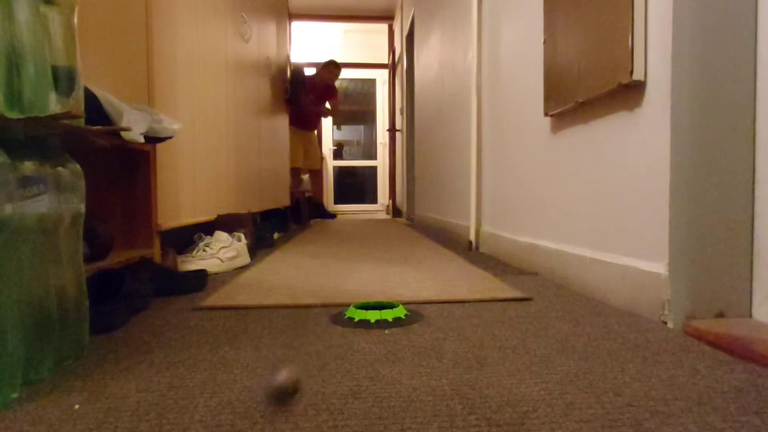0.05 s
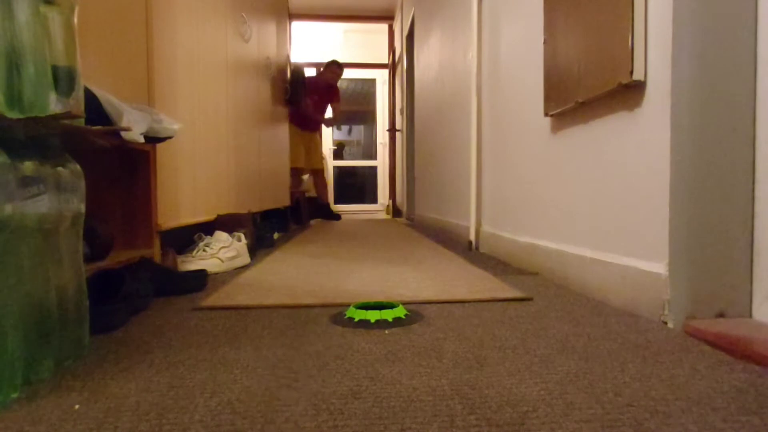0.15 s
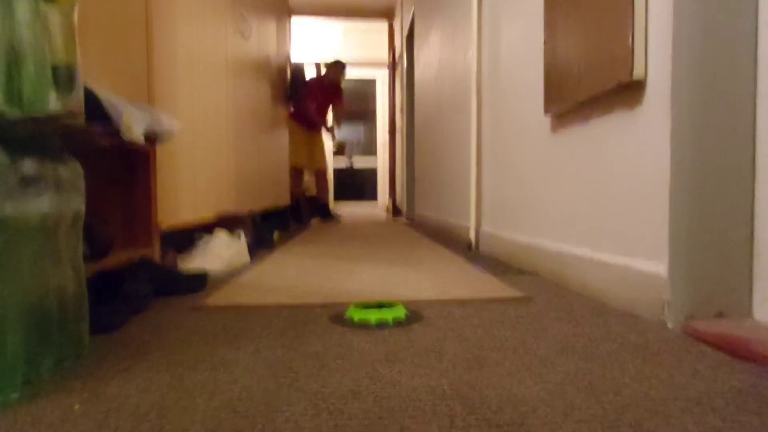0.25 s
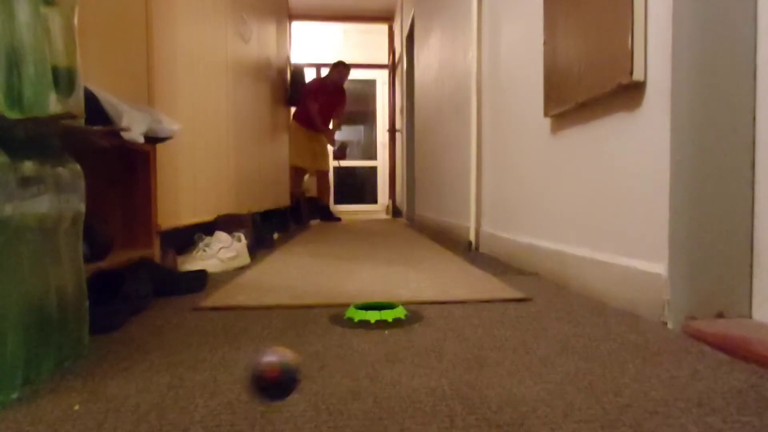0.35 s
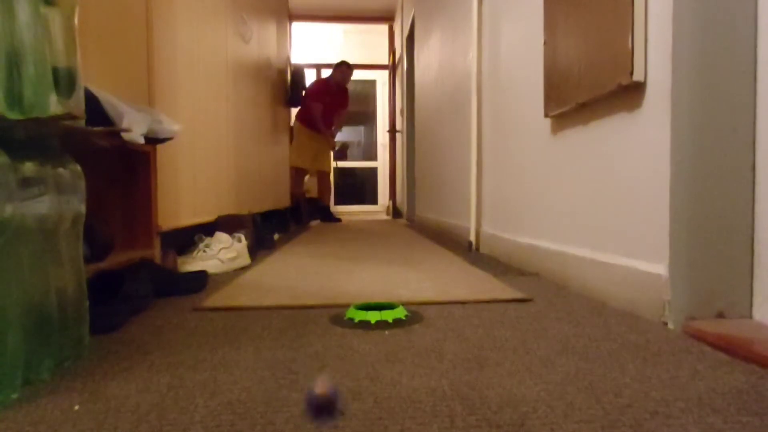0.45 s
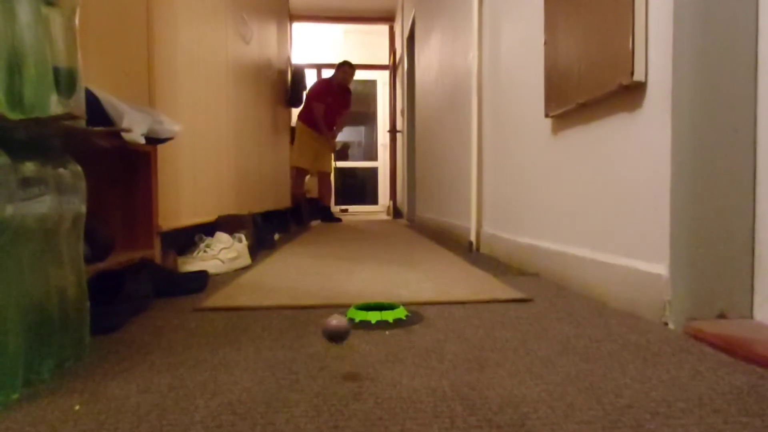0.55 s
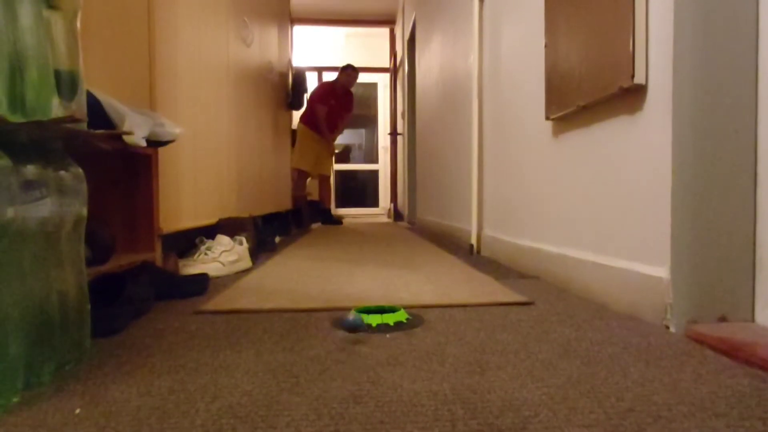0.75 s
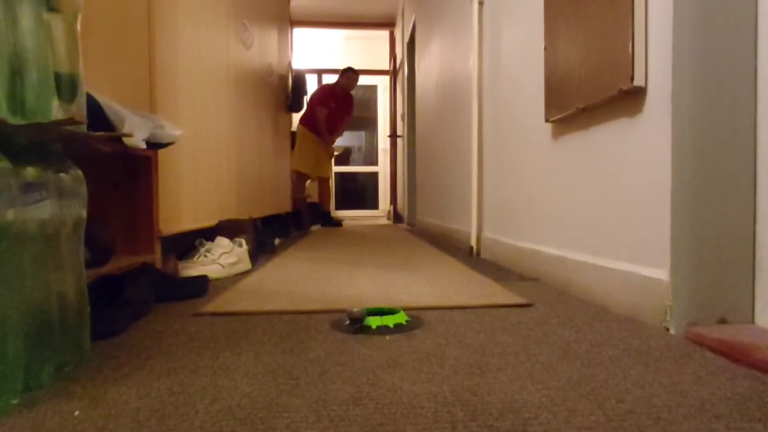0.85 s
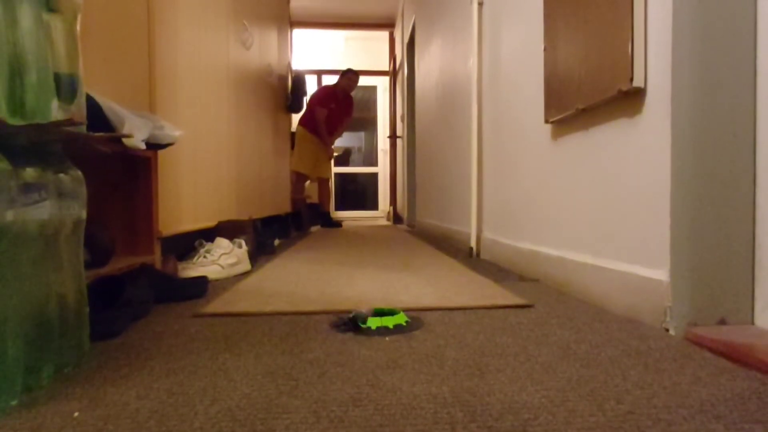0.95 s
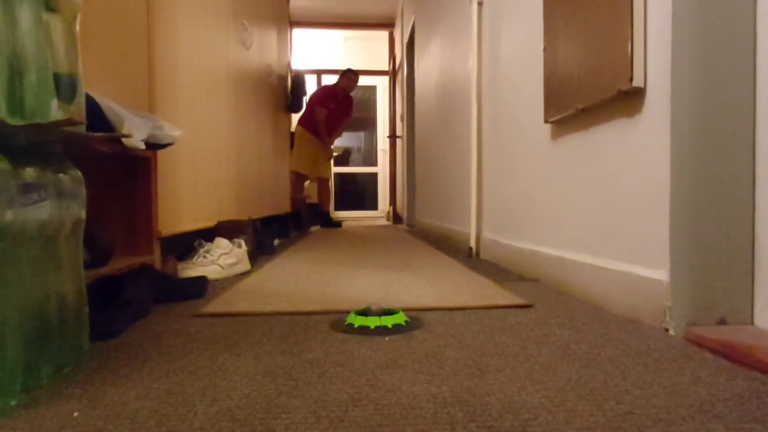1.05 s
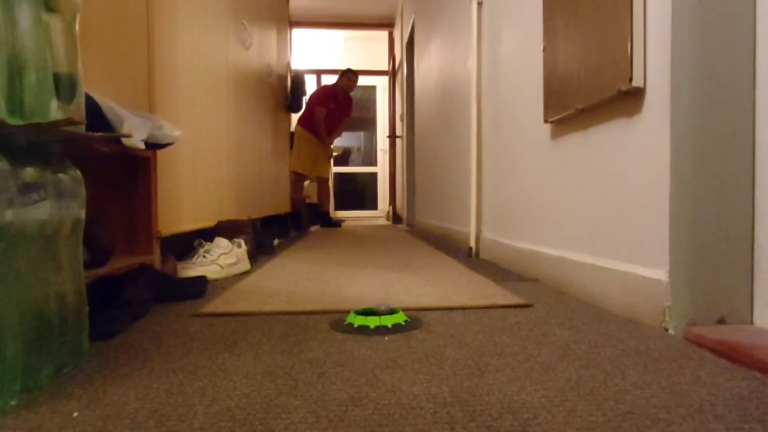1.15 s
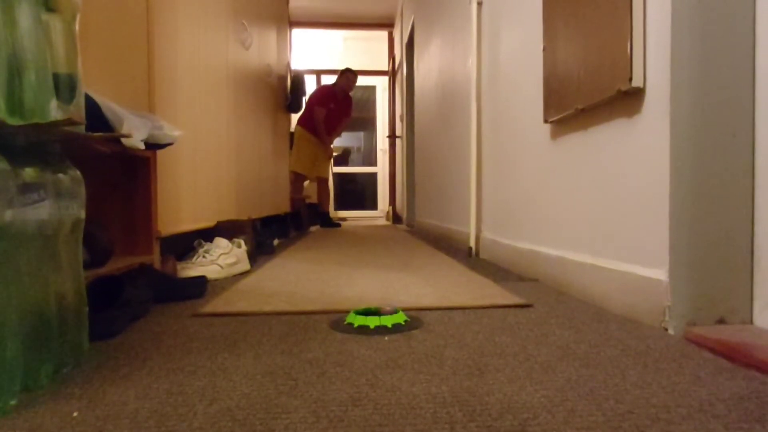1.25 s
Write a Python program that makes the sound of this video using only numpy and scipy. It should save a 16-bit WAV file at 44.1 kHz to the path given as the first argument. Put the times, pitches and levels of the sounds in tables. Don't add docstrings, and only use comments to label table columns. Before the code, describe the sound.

One sharp, loud knock as a small hard ball hits a box right beside the microphones, after faint carpet hops; low floor booms and hallway echo follow, then softer bounces and a faint plastic cup rattle.

```python
import sys
import numpy as np
from scipy import signal
from scipy.io import wavfile
from scipy.ndimage import uniform_filter1d

SR = 44100
rng = np.random.default_rng(int(sys.argv[2]) if len(sys.argv) > 2 else 0)


def generate_wav(signal):
    frames = np.transpose(np.atleast_2d(signal))
    scaled = np.clip(frames, -1, 1) * 32767
    pcm = np.round(scaled).astype(np.int16)
    wavfile.write(sys.argv[1], SR, pcm)


def volts_from_decibels(level):
    exponent = np.asarray(level, float) / 20
    return 10 ** exponent


N = 57330

# frequency in Hz, level in dB.
ROOM_TONE = [(15, -33), (25, -0.5), (156, -1.5), (421, -19), (761, -35), (1950, -46.5), (3000, -59.5),
             (3930, -49), (15500, -63.5)]
# time in seconds, level in dB.
RUMBLE_FADE = [(0, 15.5), (.23, 5), (.6, -2.5), (.9, 0.5), (1.05, -6), (1.3, -6.5)]
# time in seconds, level in dB.
HISS_FADE = [(0, 16), (0.229, 14), (0.549, 0), (1.3, -4)]
# start in seconds, level in dB, contact in ms, cup ring in dB, left-right pan in dB.
LANDINGS = [(.0, -50, 0.66, -28, -23.5), (0.015, -37.5, 1.3, -9.5, -9), (0.116, -32.5, 0.52, -9.5, -1),
            (0.374, -34, 0.27, -30, -5), (.417, -43, 0.2, -29, 11), (0.487, -54.5, 0.13, -32, -13),
            (0.5218, -37.5, 0.43, -19, -6), (0.65, -49, 0.66, -3, 13), (0.73, -52, 0.84, -12.5, -9),
            (0.808, -51, 1.2, 0, -11.5), (0.871, -47, 3.6, -6, 16), (0.945, -45.5, 1.3, 4.5, 6),
            (1.081, -53.5, 0.29, 9.5, 3), (1.207, -52, .45, -7, -3)]
# frequency in Hz, level in dB, T60 in seconds.
BOARD_MODES = [(168, -6.5, .06), (260, -3, 0.074), (368, -5.5, 0.11), (476.3, 1.5, 0.037),
               (713, -6.5, 0.068), (926, -12, 0.044), (1157, -12.5, 0.043), (1730, -13, 0.04)]
# frequency in Hz, T60 in seconds, level in dB.
HALL_DECAY = [(59.8, 0.36, -2), (130, 1, 1.5), (300, .55, 5.5), (730, .45, -9), (1508, 0.51, -15),
              (2850, 0.48, -24), (6800, 0.49, -33), (12900, 0.26, -29.5)]
# start in seconds, level in dB, pitch in Hz, left-right pan in dB.
LATE_BOOMS = [(0.034, -54.5, 113.2, 5), (.075, -42.5, 116.6, 26), (0.117, -35, 127.6, 6.5),
              (0.131, -26, 86.4, -6), (0.164, -33.5, 131, 8), (0.277, -24, 74.7, 14.5),
              (0.306, -21, 119.5, -3.5), (.32, -28.5, 68.3, 12), (0.312, -30, 260, -3.5),
              (0.374, -30, 66, -0.5), (0.413, -26.5, 130, 1), (0.486, -35, 93.4, -4),
              (.525, -33, 108.7, 1), (.73, -35, 125, -0.5), (.75, -46.5, 79, -4), (0.872, -43.5, 90, -2),
              (0.894, -47, 114, -16.5), (.94, -42.5, 105, -4.5), (1.109, -60.5, 65.3, 13),
              (1.211, -48, 86, 0)]
SCRAPE_STARTS = [.115, .5205, .655, .805, .946, .963, .978, 1.078, 1.11, 1.126, 1.205]
# decay constant in seconds, level in dB, left-right pan in dB.
SCRAPES = [(.01, -58, -3), (0.0052, -63, 8), (0.0062, -69.5, -8), (0.0071, -68, -10.5),
           (0.029, -61.5, -6.5), (0.018, -59, 8.5), (0.045, -60, 4), (0.018, -60, 0.5),
           (0.0081, -68.5, 11.5), (0.038, -69.5, -3), (0.0059, -65.5, 3.5)]
# frequency in Hz, width in Hz, level in dB.
CUP_WALL_BANDS = [(1590, 660, 7), (2000, 440, 0.5), (3420, 560, -2.5), (5555, 690, -16.5),
                  (6667, 1200, -28.5), (11880, 4000, -23)]
# frequency in Hz, level in dB, T60 in seconds, left-right pan in dB, polarity at the right mic.
BOX_MODES = [(72, -26, 0.28, 5, -1), (128, -11.5, .12, 5, 1), (165.3, -8.5, .08, 1, 1),
             (313.3, -8.5, 0.18, -4, 1), (476.6, -6.5, 0.045, 11.5, -1), (622, -0.5, 0.025, 14.5, -1),
             (835, 0, .025, 8.5, 1), (1173, -5, .02, 7, 1), (1964, 2, 0.042, 6, 1),
             (2697, 2.5, 0.0062, 0, 1), (3400, -9.5, 0.018, 7.5, -1), (4170, -5.5, 0.054, 13, -1),
             (6920, -17, 0.0075, 7, 1), (8630, -21, 0.016, -3.5, 1)]

KNOCK_S, KNOCK_DB, KNOCK_CONTACT_MS = 0.2448, -1, 0.11


def ring(x, hz, t60):
    pole = np.exp(2j * np.pi * hz / SR - np.log(1000) / (max(t60, 1e-3) * SR))
    return signal.lfilter([1], [1, -pole], x).imag


def band(x, hz, width):
    b, a = signal.iirpeak(min(hz, 0.45 * SR), hz / width, fs=SR)
    return signal.lfilter(b, a, x)


def noise_band(noise, hz, width):
    return band(band(noise, hz, width), hz, width)


def push(at_s, ms):
    u = (np.arange(N) / SR - at_s) / (max(ms, 0.06) / 1000)
    force = np.where((u > 0) & (u < 1), np.sin(np.pi * u) ** 2, 0)
    return force / (force.sum() + 1e-12)


def panned(x, db):
    return x * volts_from_decibels(np.array([[db], [-db]]) / 2)


def walk(rate):
    hold = int(SR / rate)
    steps = np.repeat(rng.standard_normal(N // hold + 1), hold)
    drift = uniform_filter1d(uniform_filter1d(steps, hold), hold)[:N]
    return drift / drift.std()


def hum():
    t, out, tone = np.arange(N) / SR, 0, np.array(ROOM_TONE)
    rumble = np.interp(t, *np.array(RUMBLE_FADE).T)
    hiss = np.interp(t, *np.array(HISS_FADE).T)
    for hz in 28 * 2 ** np.arange(0, 9.2, 0.5):
        low_share = 1 / (1 + (hz / 690.0) ** 2)
        flicker_db = 3 * walk(14)
        db = np.interp(np.log(hz), np.log(tone[:, 0]), tone[:, 1])
        db = db + low_share * (rumble + flicker_db) + (1 - low_share) * hiss
        out = out + volts_from_decibels(db) * noise_band(rng.standard_normal((2, N)), hz, hz / 2)
    return out * volts_from_decibels(-58.5 + 25.5)


def hops():
    pile_db, pile_t60_s = -5, 0.066
    cup_hz, cup_split_hz, cup_t60_s = 325.2, 13, 0.12
    out, forces = np.zeros((2, N)), np.zeros(N)
    colour = rng.standard_normal((len(LANDINGS), 2, len(BOARD_MODES)))
    pile_fade = volts_from_decibels(-60 * np.arange(2000) / SR / pile_t60_s)
    fibres = rng.standard_normal((len(LANDINGS), 2, 2000)) * pile_fade
    for (at_s, db, ms, cup_db, pan_db), chance, crush in zip(LANDINGS, colour, fibres):
        force = push(at_s, ms)
        modes = np.array([ring(force, hz * (1 + 0.034 * c), t60) * volts_from_decibels(mode_db)
                          for (hz, mode_db, t60), c in zip(BOARD_MODES, chance[0])])
        boards = np.sign(chance) @ modes
        pile = signal.fftconvolve(force[None], crush, axes=1)[:, :N]
        cup = ring(force, cup_hz + cup_split_hz, cup_t60_s) - ring(force, cup_hz - cup_split_hz, cup_t60_s)
        out += volts_from_decibels(db) * panned(boards + volts_from_decibels(pile_db) * pile + volts_from_decibels(cup_db) * cup, pan_db)
        forces += volts_from_decibels(db) * force
    return out, forces


def hall(blows):
    alike, build_ms = 0.1, 6
    t, echo, table = np.arange(N) / SR, 0, np.array(HALL_DECAY)
    for hz in 45 * 2 ** np.arange(0, 8.5, 1 / 3):
        t60 = np.interp(np.log(hz), np.log(table[:, 0]), table[:, 1])
        db = np.interp(np.log(hz), np.log(table[:, 0]), table[:, 2])
        mid, side = noise_band(rng.standard_normal((2, N)), hz, hz / 3)
        pair = np.sqrt(1 + alike) * mid + np.sqrt(1 - alike) * side * np.array([[1], [-1]])
        echo = echo + pair * volts_from_decibels(db - 60 * t / t60) / np.sqrt(t60 * SR / 14)
    echo = echo * (1 - np.exp(-t * 1000 / build_ms))
    return volts_from_decibels(23.5) * signal.fftconvolve(blows[None], echo, axes=1)[:, :N]


def boom_swell(at_s, hz):
    t60 = 8.3 / hz
    return ring(ring(push(at_s, 2.8), hz, t60), hz, t60) * hz * 3 / SR


def booms():
    out = 0
    lags_s = 0.003 * rng.standard_normal(len(LATE_BOOMS))
    for (at_s, db, hz, pan_db), lag_s in zip(LATE_BOOMS, lags_s):
        pair = np.array([boom_swell(at_s, hz), boom_swell(at_s + lag_s, hz)])
        out = out + volts_from_decibels(db) * panned(pair, pan_db)
    return out


def rush():
    peak_s, rise_s, level_db = 0.21, 0.05, -57.5
    t = np.arange(N) / SR
    swell = np.exp(-((t - peak_s) / rise_s) ** 2) * (t < KNOCK_S)
    return volts_from_decibels(level_db) * swell * noise_band(rng.standard_normal((2, N)), 5500, 5000)


def rattle():
    clicks_per_s, spread_db = 9000, 1.5
    t, shape = np.arange(N) / SR, 0
    hits = rng.random((2, N)) < clicks_per_s / SR
    clicks = hits * rng.standard_normal((2, N)) * volts_from_decibels(spread_db * rng.exponential(size=(2, N)))
    clicks = clicks / clicks.std() * volts_from_decibels(1.8 * walk(220))
    for at_s, (decay_s, db, pan_db) in zip(SCRAPE_STARTS, SCRAPES):
        attack = np.clip((t - at_s) / 0.0022, 0, 1)
        decay = np.exp(-np.maximum(t - at_s, 0) / decay_s)
        shape = shape + volts_from_decibels(db) * panned(decay * attack, pan_db)
    return sum(volts_from_decibels(db + 1.5) * band(clicks * shape, hz, width) for hz, width, db in CUP_WALL_BANDS)


def knock():
    mic_lag_ms, max_cycles = 0.3, 42
    lead_in_s, lead_in_db = 0.2395, -20
    crack_db, crack_t60_s, crack_hz, crack_pan_db = -11.5, 0.0083, 5400, -3.5
    t = np.arange(N) / SR
    age = t - KNOCK_S
    force = np.array([push(KNOCK_S, KNOCK_CONTACT_MS), push(KNOCK_S + mic_lag_ms / 1000, KNOCK_CONTACT_MS)])
    body = 0
    for k, (hz, db, t60, pan_db, side) in enumerate(BOX_MODES):
        if hz > 400:
            t60 = min(t60, max_cycles / hz)
        polarity = (-1) ** k * np.array([[1], [np.sign(side)]])
        body = body + volts_from_decibels(db) * polarity * panned(ring(force, hz, t60), pan_db)
    fade = (age > 0) * volts_from_decibels(-60 * np.maximum(age, 0) / crack_t60_s)
    treble = signal.butter(2, crack_hz, "high", fs=SR, output="sos")
    crack = signal.sosfilt(treble, rng.standard_normal((2, N)) * fade)
    lead_in_shape = np.clip((t - lead_in_s) / 0.002, 0, 1) * (age < 0)
    lead_in = volts_from_decibels(4.5) * noise_band(rng.standard_normal((2, N)) * lead_in_shape, 2300, 3000)
    return volts_from_decibels(KNOCK_DB) * (body + volts_from_decibels(crack_db) * panned(crack, crack_pan_db) + volts_from_decibels(lead_in_db) * lead_in)


def scene():
    thuds, forces = hops()
    scrape = rattle()
    blows = volts_from_decibels(KNOCK_DB) * push(KNOCK_S, KNOCK_CONTACT_MS)
    blows = blows + volts_from_decibels(-6.5) * forces + volts_from_decibels(-20.5) * scrape[1]
    return hum() + thuds + hall(blows) + booms() + rush() + scrape + knock()


def roll_off(x):
    return signal.sosfilt(signal.butter(12, 15640, fs=SR, output="sos"), x)


def record(dry):
    bass_cut = signal.butter(4, 50, "high", fs=SR, output="sos")
    top_cut = signal.ellip(8, 0.3, 70, 15000, fs=SR, output="sos")
    x = signal.sosfilt(bass_cut, dry)
    x = 0.87 * np.tanh(x / 0.87)
    return roll_off(signal.sosfilt(top_cut, x))


dry = scene()
out = record(dry)
generate_wav(out)
```